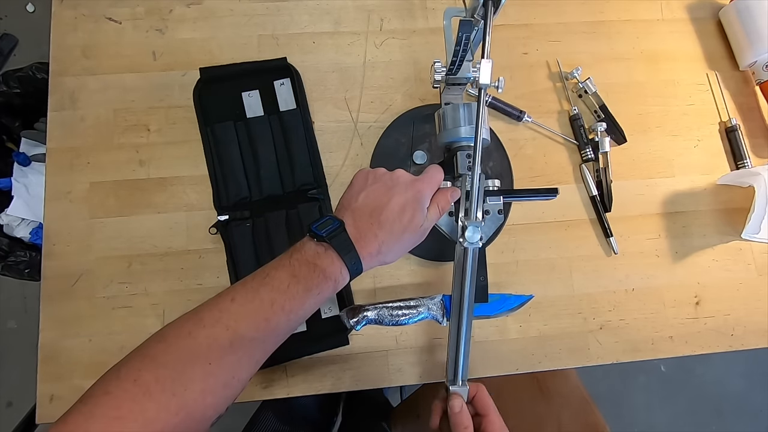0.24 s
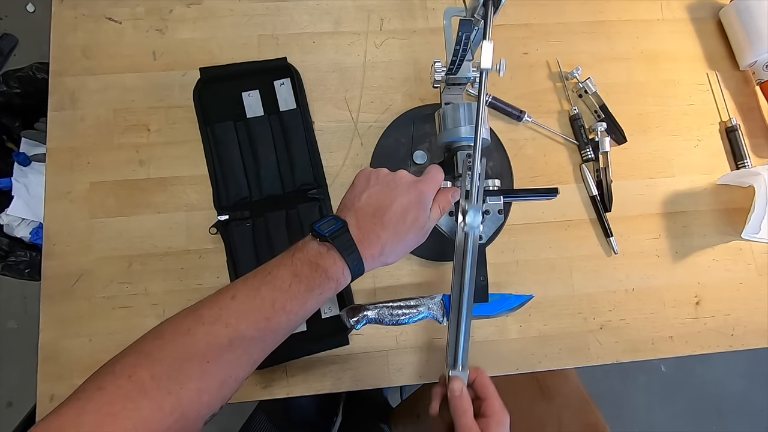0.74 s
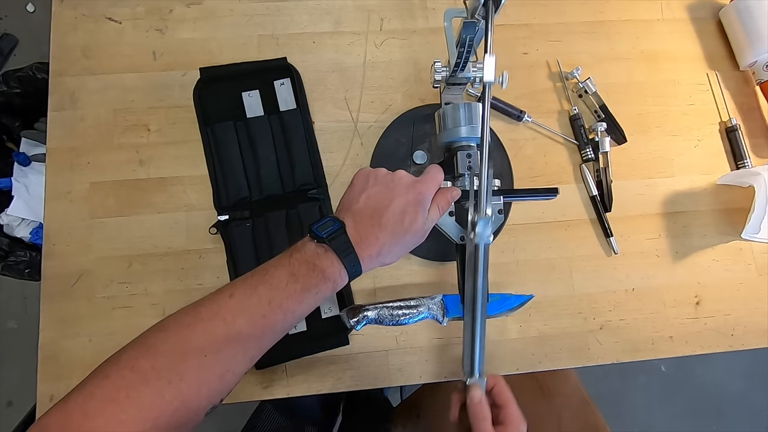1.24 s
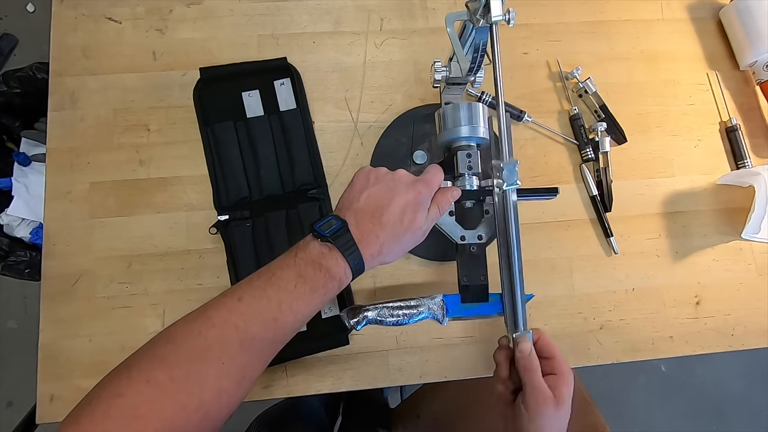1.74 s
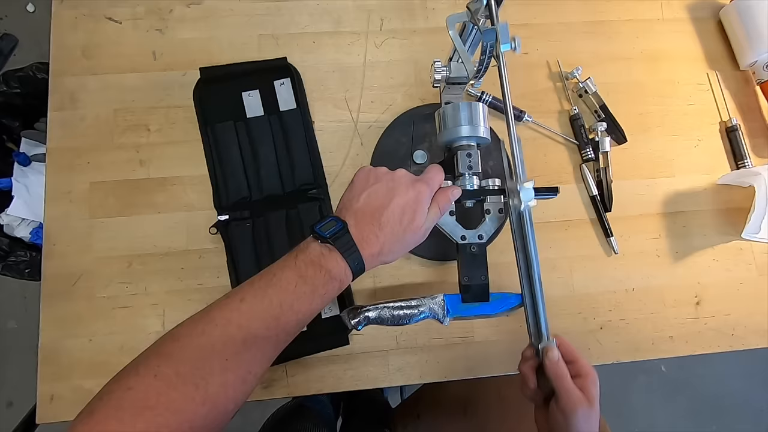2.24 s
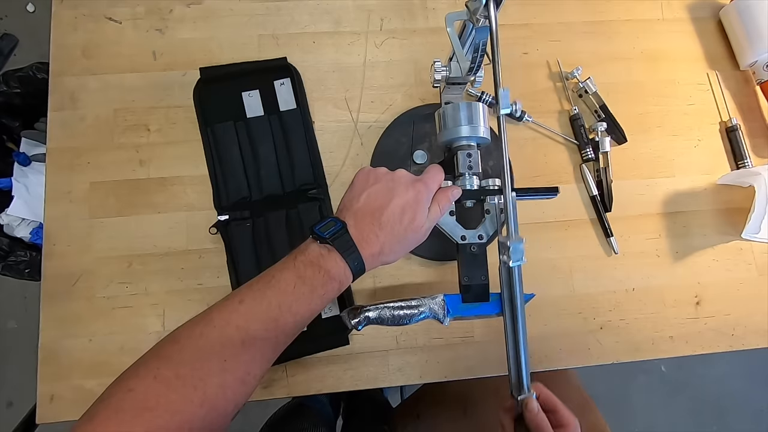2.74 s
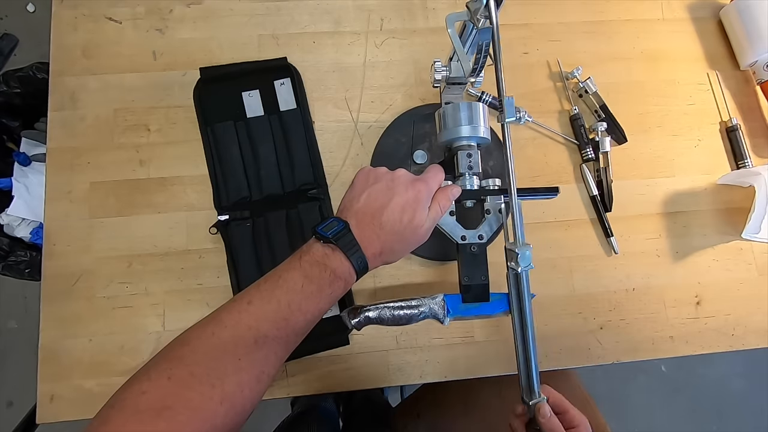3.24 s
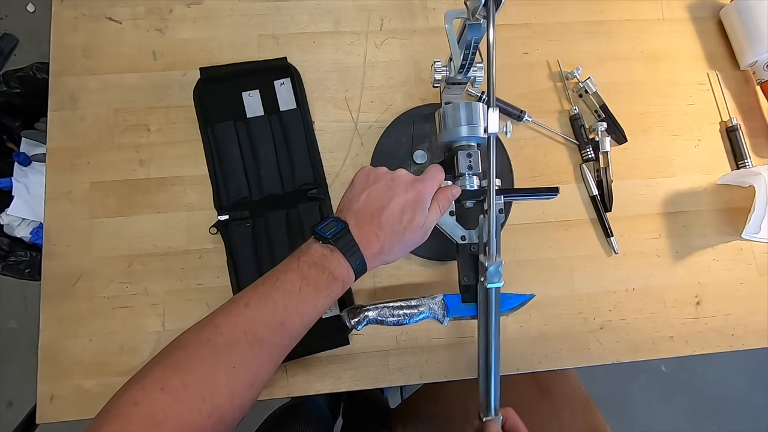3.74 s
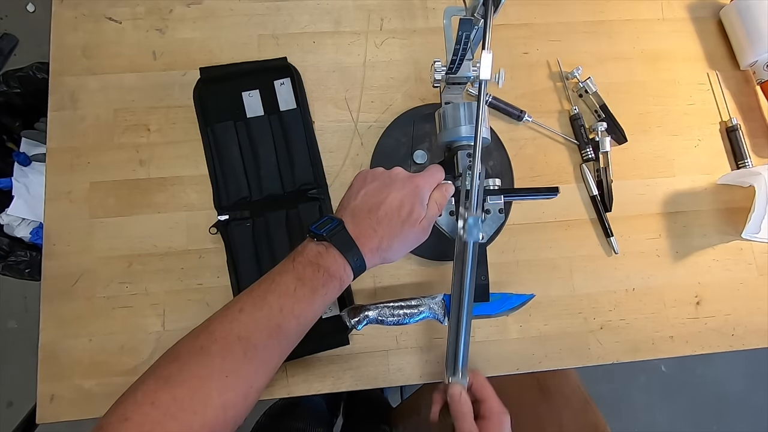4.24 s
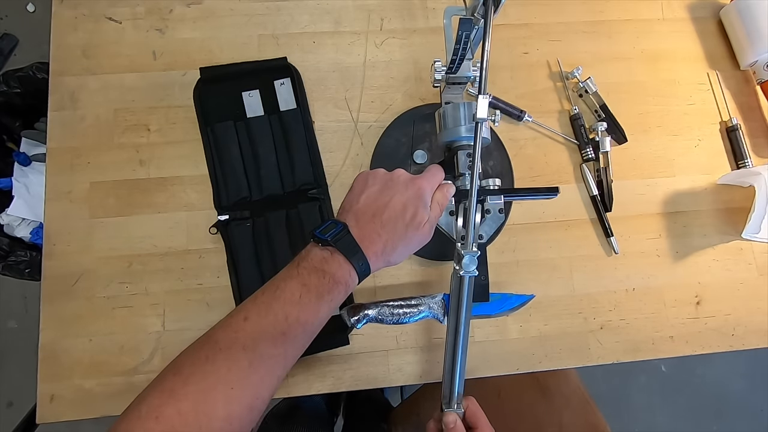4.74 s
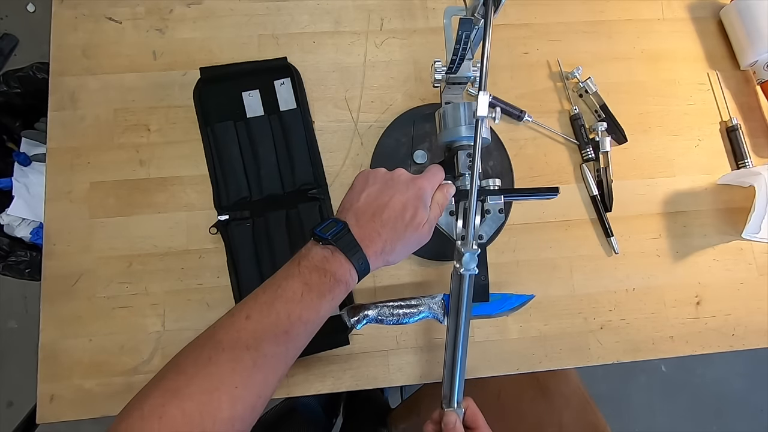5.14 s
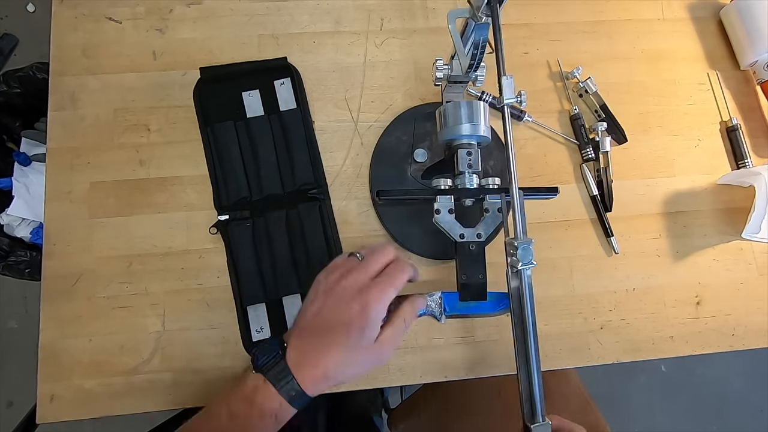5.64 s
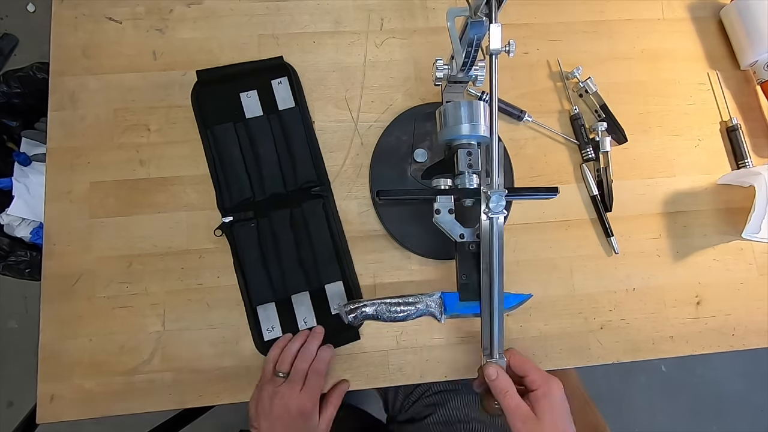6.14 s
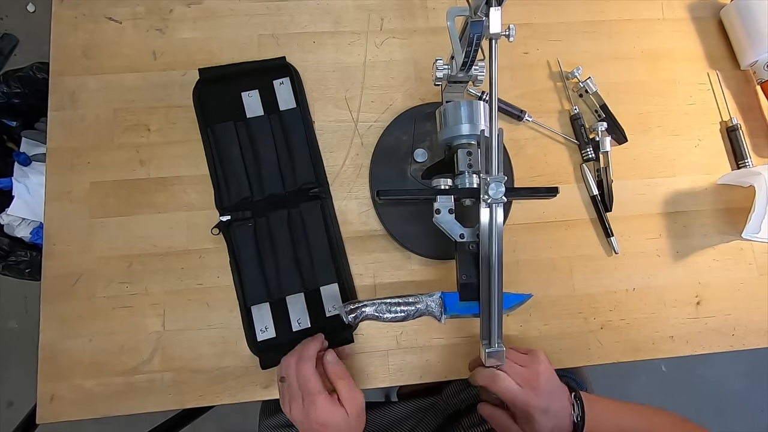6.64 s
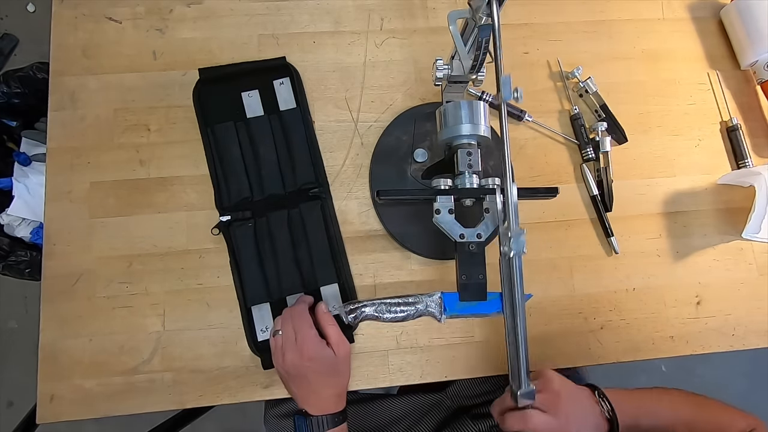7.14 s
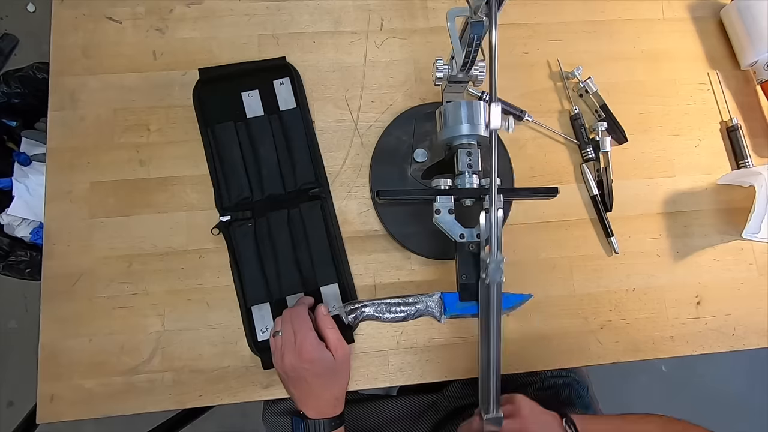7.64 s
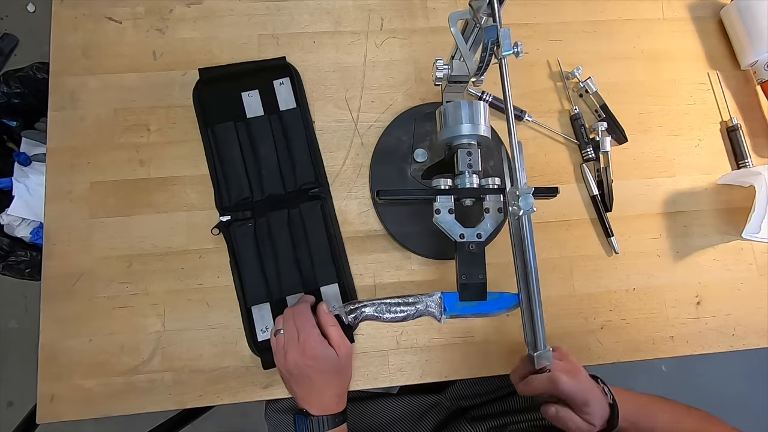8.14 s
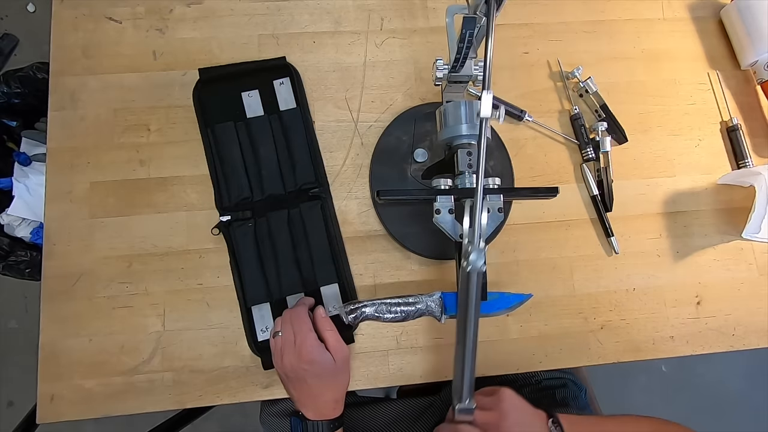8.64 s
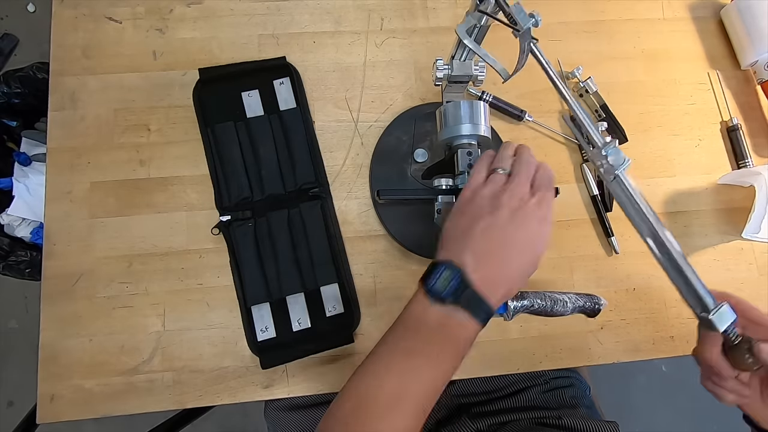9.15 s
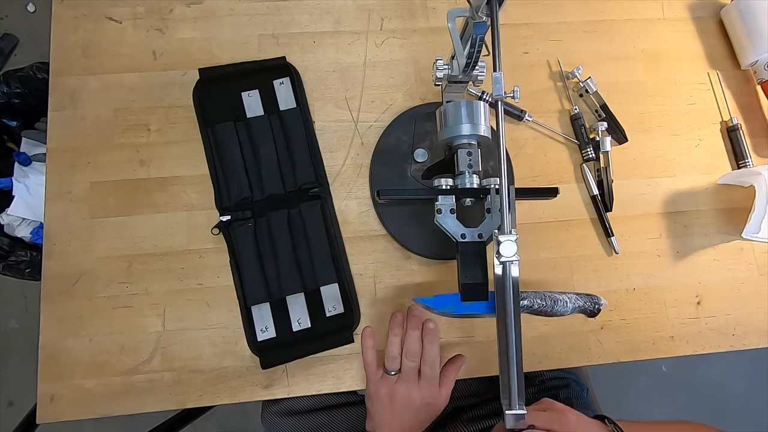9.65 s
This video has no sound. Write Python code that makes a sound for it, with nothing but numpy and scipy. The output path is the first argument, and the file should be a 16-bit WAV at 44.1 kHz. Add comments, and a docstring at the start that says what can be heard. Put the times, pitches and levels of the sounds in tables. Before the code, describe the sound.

Close to a wooden bench in a quiet workshop with faint air and microphone hiss. From 0 to 1.5 s a stone scrubs a clamped knife very fast, around twenty strokes a second: bright gritty hiss, thin blade ring around 4 to 6 kHz, chirpy bite and a low rod rattle. After a brief gap a second run goes from 1.7 to 4.4 s, with a sharp knock at 1.9. From 4.5 to 5.6 s come hesitant single strokes in small clusters. Around 5.6 to 6.4 s the rod clacks, bumps land and a stiff pouch scuffs; a faint seat creak at 6.4. The third run lasts 6.5 to 8.7 s, with knocks at 6.75 and dull thuds beneath. The arm slides away; at 9.1 the flipped clamp hits with the loudest knock, ringing through the bench. Near quiet follows, with a barely audible creak at 9.3, then two light loose strokes from 9.8.

```python
"""On a wooden bench in a quiet workshop, close to the microphones, a stone on a guided arm scrubs a clamped
knife about twenty strokes a second: grit hisses, the blade rings and the guide rod rattles in its pivot.
After two runs come dull bumps, hesitant single strokes, clacks of the rod and a nudge of the tool pouch.
A seat creaks, a third run follows, then the clamp is flipped over with a knock before two last loose strokes.
Shaped noise drives the rubbing parts; knocks and bumps are decaying sines; reflections widen it all."""
import sys
import numpy as np
from scipy import signal
from scipy.fft import rfft, irfft
from scipy.io import wavfile
from scipy.ndimage import uniform_filter1d, map_coordinates

SR = 44100
rng = np.random.default_rng(int(sys.argv[2]) if len(sys.argv) > 2 else 0)


def generate_wav(signal):
    """Clip the signal to [-1, 1] and save it as 16-bit WAV at the path in sys.argv[1]."""
    frames = np.transpose(np.atleast_2d(signal))
    scaled = np.clip(frames, -1, 1) * 32767
    pcm = np.round(scaled).astype(np.int16)
    wavfile.write(sys.argv[1], SR, pcm)


N = 436590
TIME = np.arange(N) / SR
FREQ = np.fft.rfftfreq(N, 1 / SR) + 1e-3  # in Hz, kept off zero for the logarithm

# Resonances of the blade. Each row: frequency in Hz, width in Hz, relative level in dB.
BLADE_MODES = [(4113, 53.5, 4.5), (4544, 79, 0), (4833, 67, -2), (5765, 300, -5), (6010, 150, -0.5),
               (7220, 280, -8)]
# Resonances of the guide rod. Each row: frequency in Hz, width in Hz, relative level in dB.
ROD_MODES = [(656.6, 62.3, 4.5), (813.6, 51.6, 3), (926.7, 35, -0.5), (1072, 17, -6), (1154, 36.5, -6.5),
             (1587, 200, -16), (2030, 340, -20.5)]
# Resonances of the stroke's chirp. Each row: frequency in Hz, width in Hz, relative level in dB.
CHIRP_MODES = [(2632, 110, 22.6), (2810, 950, 7.5)]
# Hollow resonances of the pouch with its stones. Each row: frequency in Hz, width in Hz, relative level in dB.
POUCH_MODES = [(613, 39, -1), (957, 45, -1), (1080, 93, -1), (1520, 160, 2), (2040, 200, -4),
               (3390, 200, 0.5)]
# Bench modes with the sharpener on it. Each row: frequency in Hz, relative level in dB.
BENCH_MODES = [(165, -12), (190, -15), (245, -6.5), (302, -26), (346, 2.5), (400, 1.5), (458, -9),
               (495, -0.5), (560, 0), (634, 12), (695, -1), (790, 5.5), (870, 2), (935, -16.5), (1147, -5),
               (1360, -11.5), (1545, -9.5)]

# Spectrum of the grit's hiss. Each row: frequency in Hz, relative level in dB per Hz.
GRIT_SPECTRUM = [(1500, -39), (3400, -17), (4200, -11), (6600, -14), (8400, -6.5), (9600, -10),
                 (10500, -4.5), (11100, -10.5), (12300, -1), (12980, 1), (13400, -6), (14400, -2.5),
                 (16000, -21.5)]
# Spectrum of the grit's topmost fizz. Each row: frequency in Hz, relative level in dB per Hz.
FIZZ_SPECTRUM = [(9000, -35), (12500, -43.5), (13400, -1), (14500, -7), (15450, 1), (16000, -2)]
# Spectrum of pouch fabric on wood. Each row: frequency in Hz, relative level in dB per Hz.
SCUFF_SPECTRUM = [(59, -31), (100, -2), (184, -37), (241, -10), (425, -25), (885, 6.5), (1090, -9),
                  (1290, 4.5), (1560, 9), (2130, -1), (6760, -10.5), (15000, -7.5)]
# Spectrum of metal on metal. Each row: frequency in Hz, relative level in dB per Hz.
CRACK_SPECTRUM = [(60, -44), (200, -26.5), (700, -11), (1000, 8.5), (1450, -4.5), (2200, -3.5), (3300, -6),
                  (4300, 1.5), (5800, -7), (7500, -11), (15000, -7.5)]
# Spectrum of the workshop air. Each row: frequency in Hz, relative level in dB per Hz.
AIR_SPECTRUM = [(30, -21), (100, -1), (200, -12.5), (450, -10.5), (1500, -27), (4000, -35.5),
                (12000, -50.5)]
# Microphone self-noise, with the hump of its port. Each row: frequency in Hz, relative level in dB per Hz.
MIC_SPECTRUM = [(30, -23), (130, -15), (400, -17.5), (500, -14), (590, -4), (700, -2), (900, -8.5),
                (1100, -19.5), (2300, -22), (3100, -15.5), (4200, -23), (7000, -24.5), (13000, -28.5),
                (15500, -38)]

# Balance of the direct sound. Each row: frequency in Hz, left minus right in dB.
PAN = [(100, -.4), (900, -.2), (2200, -1.7), (4300, -.6), (8000, -1.8), (13000, -2.2)]
# Reflections that differ between the channels. Each row: frequency in Hz, side against mid in dB.
WIDTH = [(60, -33.5), (300, -21), (700, -38), (1300, -21.5), (2400, -8), (4300, -13), (8000, -15),
         (13000, -21)]
# What the walls give back. Each row: frequency in Hz, level against the direct sound in dB.
WALLS = [(300, -22.5), (1500, -7.5), (5000, -12), (14000, -13.5)]

# Pace of the scrubbing, one list per run. Each row: time in seconds, strokes counted (even push, odd pull).
PACE = [
    [(-.008, 0), (.158, 3), (.575, 12), (.96, 20), (1.523, 31)],
    [(1.686, 1), (2.148, 10), (2.558, 18), (3.092, 28), (3.285, 32), (3.899, 44), (4.449, 56)],
    [(6.482, 1), (6.846, 8), (7.124, 14), (7.27, 18), (7.608, 26), (7.895, 32), (8.148, 38), (8.721, 51)],
]
# How hard the hand bears down. Each row: time in seconds, grit drive in dB, blade drive in dB.
PRESSURE = [(0, -30.5, -44), (.12, -39, -44), (.3, -42.5, -46), (.8, -41, -44.5), (1.38, -36.5, -43),
            (1.52, -39.5, -44), (1.7, -39, -45.5), (1.76, -29.5, -41), (1.93, -35, -39.5),
            (2.18, -33.5, -38), (2.42, -40, -43.5), (2.6, -41, -43.5), (2.85, -38.5, -42), (3.28, -41, -45),
            (3.41, -35.5, -41), (3.62, -36.5, -40), (3.9, -40, -45), (4.44, -44, -54.5), (6.5, -38.5, -50),
            (6.9, -34.5, -37), (7.17, -43.5, -43), (7.48, -42, -39), (7.6, -38.5, -40.5), (8.15, -37, -41),
            (8.38, -39, -42.5), (8.7, -39.5, -45.5)]
# Where the stone sits on the edge. Each row: time in seconds, fizz against grit in dB, chirp bite in dB.
EDGE = [(0, 7, -16.5), (.3, -24, -16), (.95, -4, -8), (1.8, 9, -14.5), (2.2, -11, -19), (3.1, -9, -12.5),
        (3.6, 4.5, -14), (4.4, -3.5, -5.5), (5.1, -1.5, -7.5), (5.5, -18.5, -9), (6.6, 7.5, -15.5),
        (6.9, 10, -19), (7.2, -20, -28), (7.6, 4.5, -20.5), (8.7, 5.5, -20), (9.9, -17, -13.5)]
# Extra bite of a push, taken off on a pull. One row: grit in dB, blade in dB, rod in dB.
PUSH_DB = (0.67, 2.5, 1.1)
# Random spread from stroke to stroke. One row: grit in dB, blade in dB, rod in dB.
SCATTER_DB = (1, 0.82, 1.2)
# Hesitant single strokes. Each row: start in seconds, length in seconds, stone drive in dB, rod drive in dB.
LOOSE_STROKES = [(4.507, 0.035, -60, -49), (4.606, 0.086, -63.5, -51), (4.979, 0.035, -53, -48),
                 (5.018, 0.043, -39, -40), (5.067, 0.048, -45, -40.5), (5.119, 0.036, -41.5, -38),
                 (5.149, 0.062, -51.5, -39.5), (5.257, 0.025, -49.5, -41.5), (5.287, 0.032, -38, -36.5),
                 (5.326, 0.025, -46, -38.5), (5.347, 0.049, -45, -39), (5.397, 0.022, -42, -40),
                 (5.424, 0.03, -44, -36), (5.46, 0.032, -46.5, -40), (5.486, 0.072, -58.5, -49.5),
                 (5.565, 0.032, -51.5, -47), (5.971, 0.079, -45, -42), (6.055, 0.039, -42.5, -44),
                 (6.086, 0.079, -46, -41), (9.796, 0.067, -48, -43.5), (9.871, 0.045, -40.5, -46)]
# The arm sliding with the stone lifted. Each row: middle in seconds, length in seconds, drive in dB.
SLIDES = [(1.51, 0.16, -61), (4.52, 0.2, -52.5), (4.76, 0.24, -71), (4.885, .07, -57), (5.58, 0.24, -57),
          (5.83, 0.35, -65), (5.955, 0.12, -49.5), (6.22, 1, -57), (6.45, 0.067, -53), (8.7, 0.25, -55),
          (9, 0.25, -53.5), (9.62, 0.091, -76), (9.82, .1, -70)]
# The base juddering on the bench. Each row: middle in seconds, length in seconds, drive in dB.
JUDDERS = [(.41, .08, -61), (.7, 0.83, -54), (1.18, 0.14, -63), (2.99, 0.34, -63), (3.34, 0.063, -58),
           (3.48, .14, -58), (3.98, 0.1, -54.5), (5.14, .14, -53.5), (5.4, 0.45, -50), (7.62, 0.058, -51.5)]
# Knocks of arm and clamp. Each row: start in seconds, bench ring peak in dB, metal crack drive in dB.
KNOCKS = [(0.404, -54, -46), (1.888, -26, -21), (1.903, -34, -43), (4.775, -48.5, -44.5), (4.979, -64, -46),
          (5.018, -50, -32), (5.124, -48, -36), (5.408, -45, -28), (5.633, -74, -30), (5.921, -48, -33),
          (5.978, -29, -39), (6.073, -41, -28), (6.258, -30.5, -26), (6.728, -30.5, -30), (6.755, -27, -36),
          (7.948, -34, -70), (7.964, -33.5, -70), (8.08, -37, -75), (8.208, -40, -70), (8.35, -64, -29),
          (8.497, -40.5, -40), (8.577, -28.5, -65), (8.598, -34, -70), (8.893, -40.5, -53.5),
          (9.117, -7.5, -19.5), (9.121, -24, -56), (9.143, -21, -60)]
# Dull bumps of the body against the bench. Each row: start in seconds, peak in dB.
BUMPS = [(3.849, -57), (3.96, -50), (5.748, -50.5), (6.024, -48), (6.423, -56), (6.572, -50), (6.757, -52),
         (6.891, -52.5), (7.135, -54.5), (7.411, -37.5), (7.671, -38), (7.805, -46), (7.949, -43),
         (8.093, -48), (8.221, -45), (8.592, -49), (8.848, -67), (9.335, -62)]
# The rod jolting in its pivot. Each row: start in seconds, peak in dB.
JOLTS = [(4.776, -39), (5.262, -34), (5.585, -38), (5.843, -37.5), (5.924, -31), (6.084, -22.5),
         (6.372, -43.5), (6.525, -29), (7.715, -33), (8.493, -32), (8.833, -40.5), (8.846, -42),
         (9.04, -46)]
# The pouch scuffing over the wood. Each row: start in seconds, drive in dB, time to fall 60 dB in seconds.
SCUFFS = [(5.842, -46.5, 0.23), (5.978, -38, 0.17), (6.114, -49, 0.4), (6.23, -51, 0.15),
          (6.244, -39.5, 0.13), (6.255, -31.5, 0.27), (6.298, -63, 0.41), (6.402, -43.5, 0.13)]
# Seat creaks as the body leans. Each row: start in seconds, length in seconds, pitch in Hz, level in dB.
CREAKS = [(6.405, 0.054, 1396, -59.5), (9.285, 0.076, 1375, -74)]

ROD_DB = -45  # drive of the rod, which rubs alike however hard the stone presses
RUMBLE_DB = -26  # bench against the rod's drive
AIR_DB, MIC_DB = -86, -68
POUCH_WIDTH_DB = 7  # the pouch lies off to one side and is heard more by its reflections
TOP_HZ = 15800


def undb(db):
    """Decibels to gain."""
    return 10 ** (np.asarray(db) / 20)


def unit(x):
    """Scale to rms 1."""
    return x / np.sqrt(np.mean(x ** 2))


def curve(rows):
    """Gain along time from (s, dB) rows."""
    return undb(np.interp(TIME, *np.transpose(rows)))


def slope(points):
    """Gain along frequency from (Hz, dB) points, straight in log frequency."""
    hz, db = np.transpose(points)
    return undb(np.interp(np.log(FREQ), np.log(hz), db))


def colour(x, points):
    """Give x a spectrum; rms 1."""
    return unit(irfft(rfft(x) * slope(points), N))


def resonate(x, modes, skirt_order=2):
    """Drive resonances; the part radiates poorly below its lowest one. Rms 1."""
    gain = 0
    for k, (hz, width, db) in enumerate(modes):
        # neighbouring modes move in opposite phase
        gain = gain + (-1) ** k * undb(db) / (1 + 1j * (FREQ ** 2 - hz ** 2) / (FREQ * width))
    skirt = signal.butter(skirt_order, 0.82 * modes[0][0], "high", fs=SR, output="sos")
    return unit(signal.sosfilt(skirt, irfft(rfft(x) * gain, N)))


def add(out, s, sound):
    """Mix a sound in at time s."""
    i = max(0, int(s * SR))
    out[i:i + len(sound)] += sound[:max(0, N - i)]


def walk(rate):
    """Smooth random wander through `rate` knots a second, spread near 1."""
    knots = rng.standard_normal(4 * N // 100)
    return 1.2 * np.interp(TIME * rate, np.arange(len(knots)), knots)


def grains(spread_db, catch_db, catch_rate):
    """Dense micro-impacts of uneven size, in clusters as the surfaces catch and slip."""
    size_db = spread_db * rng.standard_normal(N) + catch_db * walk(catch_rate)
    return rng.standard_normal(N) * undb(size_db)


def swells(rows):
    """Gain along time from (middle s, length s, dB) movements that rise and fall smoothly."""
    out = np.zeros(N)
    for s, length, db in rows:
        add(out, s - length / 2, undb(db) * np.hanning(int(length * SR)))
    return out


def hand():
    """Every stroke as (s, length s, hiss dB, blade dB, rod dB), pushes and pulls alternating within a run."""
    rows = [(s, length, db, db, rod_db) for s, length, db, rod_db in LOOSE_STROKES]
    pressure_s, grit_db, ring_db = np.transpose(PRESSURE)
    for run in PACE:
        times, counts = np.transpose(run)
        for k in range(int(counts[0]), int(counts[-1])):
            start, end = np.interp([k, k + 1], counts, times)
            middle = (start + end) / 2
            hiss_db = np.interp(middle, pressure_s, grit_db)
            blade_db = np.interp(middle, pressure_s, ring_db)
            uneven_db = (-1) ** k * np.array(PUSH_DB) + SCATTER_DB * rng.standard_normal(len(SCATTER_DB))
            rows.append((start, end - start, *(uneven_db + [hiss_db, blade_db, ROD_DB])))
    return np.array(sorted(rows))


def stroke_force(strokes, levels_db, rest, power, skew, smooth_s):
    """Each stroke speeds up from rest and slows to the next turn; rest is what still sounds at the turn."""
    out = np.zeros(N)
    for (s, length, *_), db in zip(strokes, levels_db):
        progress = np.linspace(0, 1, max(8, int(length * SR)))
        speed = np.abs(np.sin(np.pi * progress ** skew))
        add(out, s, undb(db) * unit(rest + speed ** power))
    return uniform_filter1d(out, max(1, int(smooth_s * SR)))


def stone_travel(starts):
    """Place of the contact along the stone, going between -1 and 1 and back on alternate strokes."""
    return -np.cos(np.pi * np.interp(TIME, starts, np.arange(len(starts))))


def holder_echo(x, travel, lag_s, swing, drift, echo):
    """Vibration returns from the end of the stone holder; its path changes with travel, so peaks glide."""
    lag = lag_s * SR * (1 + swing * travel + drift * walk(5.5))
    returned = map_coordinates(x, [np.arange(N) - lag], order=3, mode="nearest")
    return (x + echo * returned) / np.sqrt(1 + echo ** 2)


def workshop_air():
    """Quiet room air: steady noise, strongest in the lows."""
    return colour(rng.standard_normal(N), AIR_SPECTRUM) * undb(AIR_DB)


def stone(strokes):
    """Grit cuts the edge: a bright hiss, the ringing blade, and a chirp with each stroke's bite."""
    starts, _, hiss_db, blade_db, _ = strokes.T
    travel = stone_travel(starts)
    edge = np.array(EDGE)
    top, bite = curve(edge[:, :2]), curve(edge[:, ::2])
    # coarse grains catch the edge and jolt hiss and ring at once
    catch = undb(1.3 * walk(260))

    grit = colour(grains(3.5, 1.0, 900), GRIT_SPECTRUM)
    fizz = colour(grains(3.2, 1.5, 700), FIZZ_SPECTRUM)
    hiss = (grit + top * fizz) / np.sqrt(1 + top ** 2)
    hiss = holder_echo(hiss, travel, lag_s=.00045, swing=.05, drift=.07, echo=.5)
    hiss *= stroke_force(strokes, hiss_db, rest=0.18, power=1.13, skew=1.01, smooth_s=.003)

    ring = resonate(grains(3, 1.6, 250), BLADE_MODES, skirt_order=8)
    ring = holder_echo(ring, travel, lag_s=.00098, swing=.05, drift=.05, echo=.25)
    ring *= undb(-5) * stroke_force(strokes, blade_db, rest=0.15, power=0.57, skew=1.27, smooth_s=0.0027)

    chirp = resonate(grains(2.8, 4.7, 100), CHIRP_MODES, skirt_order=6) * bite
    chirp *= stroke_force(strokes, blade_db, rest=0.32, power=0.18, skew=0.53, smooth_s=0.0029)
    return catch * (hiss + ring) + undb(-3.5) * chirp


def guide_rod(force):
    """The rod rubs in its pivot, rattling on through the turns, and ticks softly when the stone is lifted."""
    rub = resonate(grains(6.5, 1.52, 120), ROD_MODES, skirt_order=6) * undb(-3.0) * force
    slips = grains(5, 3.5, 110)
    slide = resonate(slips, ROD_MODES, skirt_order=6) * undb(-5.0)
    slide += resonate(slips, BLADE_MODES) * undb(-10.5)
    slide += colour(slips, GRIT_SPECTRUM) * undb(-19)
    return rub + slide * swells(SLIDES)


def bench_rumble(strokes, force):
    """Strokes shake low bench modes through the base; while it judders, each stroke starts with a lurch."""
    modes = [(156, 13, -1.5), (260, 74, -2), (300, 27, -4.0), (381.0, 55, 3.5)]  # Hz, width Hz, dB
    shaking = grains(2, 3, 55)
    lurch = stroke_force(strokes, np.zeros(len(strokes)), rest=.3, power=1.5, skew=.6, smooth_s=.004)
    drive = undb(RUMBLE_DB) * force + lurch * swells(JUDDERS)
    return resonate(shaking, modes, skirt_order=3) * drive


def knocks():
    """Metal cracks on metal with a faint room tail; the bench rings after it, higher modes dying first."""
    out, t = np.zeros(N), TIME[:SR // 2]
    crack_noise = colour(rng.standard_normal(N), CRACK_SPECTRUM)
    low_cut = signal.butter(6, 145, "high", fs=SR, output="sos")
    hz, db = np.transpose(BENCH_MODES)[:, :, None]
    t60 = .19 * (hz[0] / hz) ** 0.57
    decays = undb(db) * 1000 ** (-t / t60)
    for s, ring_db, crack_db in KNOCKS:
        detune = 1 + .005 * rng.standard_normal(hz.shape)
        ring = np.sum(decays * np.sin(2 * np.pi * hz * detune * t), axis=0)
        ring = signal.sosfilt(low_cut, ring)
        # a blow with hardly any crack is a soft one and leaves out the upper modes
        upper_hz = np.interp(crack_db - ring_db, [-30, -10], [450, 1500])
        ring = signal.sosfilt(signal.butter(4, upper_hz, fs=SR, output="sos"), ring)
        # light touches give a dry tick, heavy blows a longer crack
        crack_s = np.interp(ring_db, [-65, -30], [.007, .03])
        room_tail = undb(-17) * crack_s / 0.034 * 1000 ** (-t / .17)
        fade = 1000 ** (-t / crack_s) + room_tail
        crack = fade * np.roll(crack_noise, -int(s * SR))[:len(t)]
        add(out, s, undb(ring_db) * ring / np.abs(ring).max() + undb(crack_db - 7.0) * crack)
    return out


def bumps():
    """Soft, heavy contacts lean on the bench twice over and move only its deepest modes."""
    out, t = np.zeros(N), TIME[:SR // 2]
    modes = [(90, 1), (116, 6.5), (170, 2.0), (240, -10), (340, -5)]  # Hz, dB
    for s, db in BUMPS:
        sway = 0
        for hz, mode_db in modes:
            detune = 1 + 0.12 * rng.standard_normal()
            sway = sway + undb(mode_db) * np.sin(2 * np.pi * hz * detune * t)
        thud = sway * (1 - np.exp(-t / .012)) ** 2 * 1000 ** (-t / .085)
        thud *= undb(db) / np.abs(thud).max()
        add(out, s, thud)
        add(out, s + rng.uniform(0.0255, 0.027), undb(-13) * thud)
    return out


def jolts():
    """Play in the pivot lets the rod clack against its plastic bush, a soft contact of about a millisecond."""
    out, push = np.zeros(N), np.zeros(N)
    add(push, 0, np.hanning(SR // 900))
    clack = resonate(push, ROD_MODES, skirt_order=4)[:SR // 10]
    for s, db in JOLTS:
        add(out, s, undb(db) * clack / np.abs(clack).max())
    return out


def pouch():
    """Stiff fabric scuffs over the bench in a few short jerks and jostles the stones inside."""
    force, t = np.zeros(N), TIME[:SR // 2]
    for s, db, t60 in SCUFFS:
        add(force, s, undb(db) * 1000 ** (-t / t60))
    weave = grains(4, 3, 220)
    return force * (colour(weave, SCUFF_SPECTRUM) + undb(-6.5) * resonate(weave, POUCH_MODES))


def creaks():
    """A joint of the seat slips for a moment with a thin, wavering squeak."""
    out = np.zeros(N)
    for s, length, hz, db in CREAKS:
        n = int(length * SR)
        pitch = hz * (1 + 0.0089 * walk(200)[:n])
        phase = 2 * np.pi * np.cumsum(pitch) / SR
        add(out, s, undb(db) * unit(np.hanning(n) * np.sin(phase)))
    return out


def space(x, width_db=0):
    """Place a sound a little to the right; bench and wall reflections are decaying noise, partly side-only."""
    t = TIME[:SR // 2]
    early = rng.standard_normal(len(t)) * (1 - np.exp(-t / .002)) * 1000 ** (-t / .11)
    tail = rng.standard_normal(len(t)) * 1000 ** (-t / 0.17)
    sound = rfft(x)
    side = sound * undb(width_db) * slope(WIDTH) * rfft(early / np.linalg.norm(early), N)
    mid = sound * (1 + slope(WALLS) * rfft(tail / np.linalg.norm(tail), N))
    pan = np.sqrt(slope(PAN))
    return irfft(np.array([mid * pan + side, mid / pan - side]), N)


def scene():
    """All the work at the bench over the quiet air of the workshop."""
    strokes = hand()
    rod_force = stroke_force(strokes, strokes[:, -1], rest=2.4, power=0.92, skew=0.6, smooth_s=0.0079)
    sharpener = stone(strokes) + guide_rod(rod_force) + bench_rumble(strokes, rod_force)
    sharpener += knocks() + jolts()
    at_bench = workshop_air() + sharpener + bumps() + creaks()
    return space(at_bench) + space(pouch(), width_db=POUCH_WIDTH_DB)


def record(dry):
    """Each microphone adds its own faint hiss; a steep low-pass cuts the top."""
    hiss = undb(MIC_DB) * np.array([colour(rng.standard_normal(N), MIC_SPECTRUM) for _ in dry])
    top_cut = signal.ellip(14, .2, 80, TOP_HZ, fs=SR, output="sos")
    return signal.sosfilt(top_cut, dry + hiss)


dry = scene()
out = record(dry)
generate_wav(out)
```